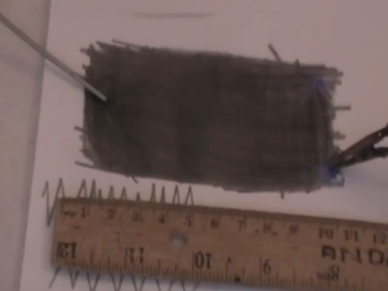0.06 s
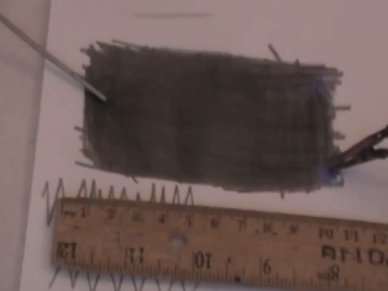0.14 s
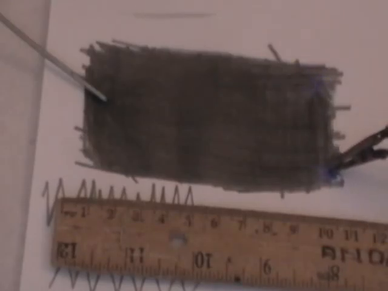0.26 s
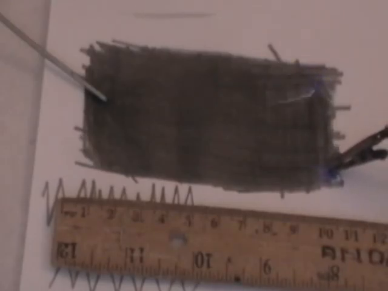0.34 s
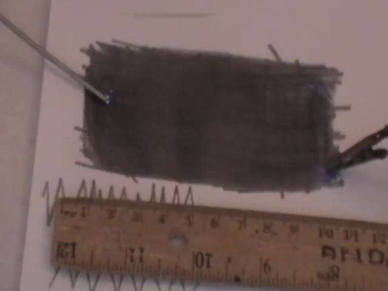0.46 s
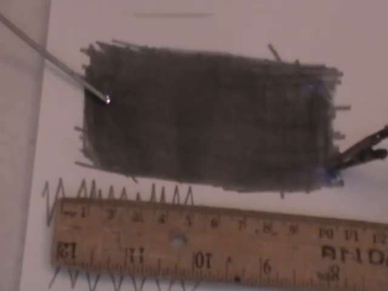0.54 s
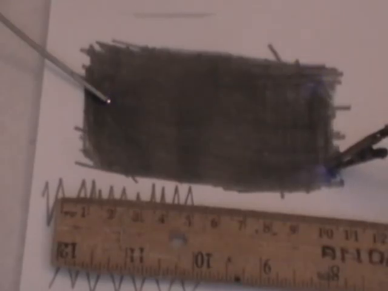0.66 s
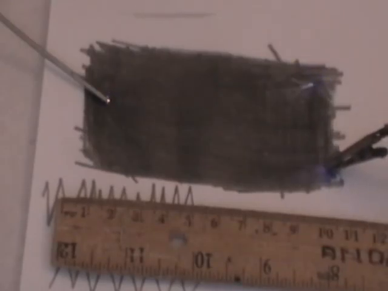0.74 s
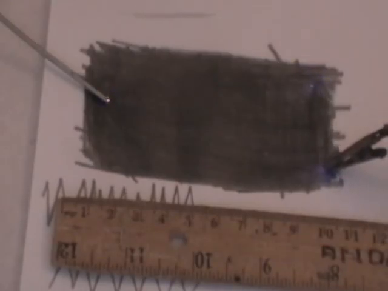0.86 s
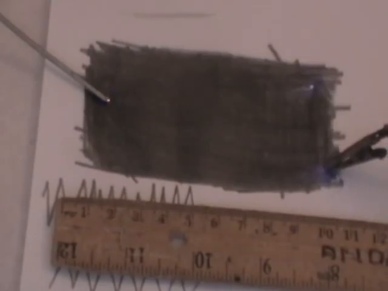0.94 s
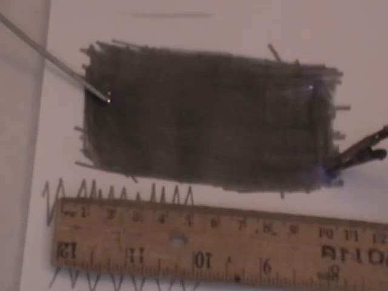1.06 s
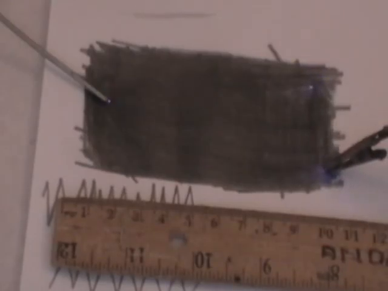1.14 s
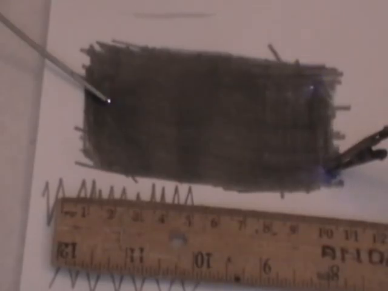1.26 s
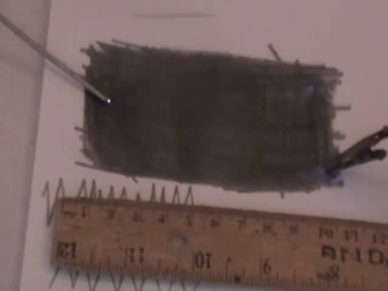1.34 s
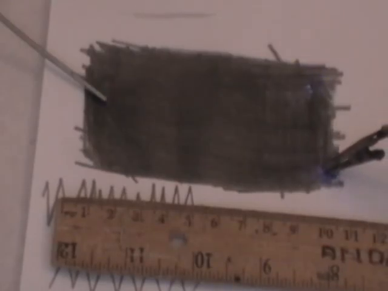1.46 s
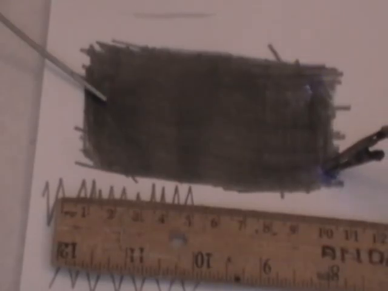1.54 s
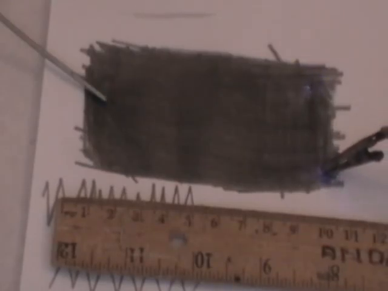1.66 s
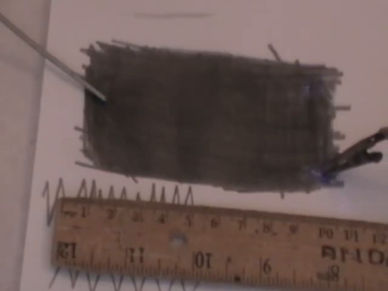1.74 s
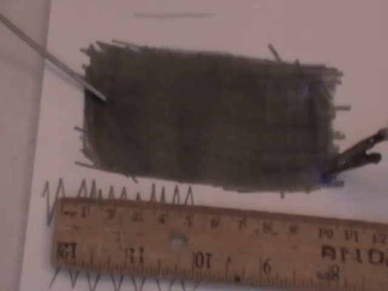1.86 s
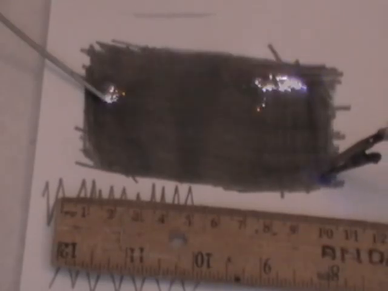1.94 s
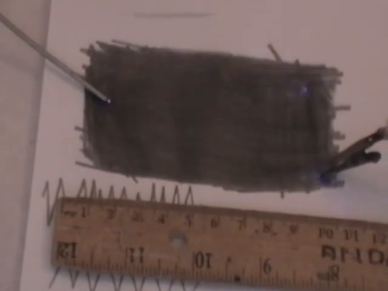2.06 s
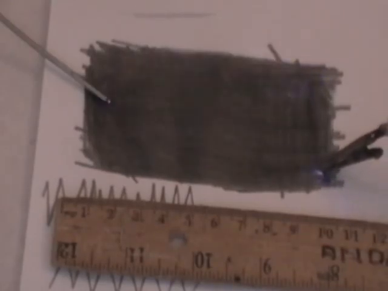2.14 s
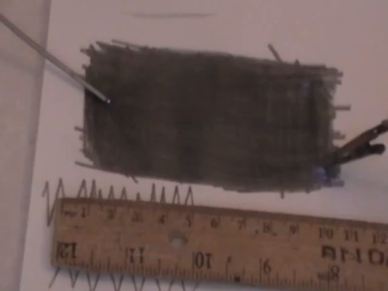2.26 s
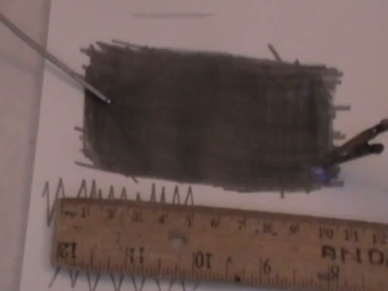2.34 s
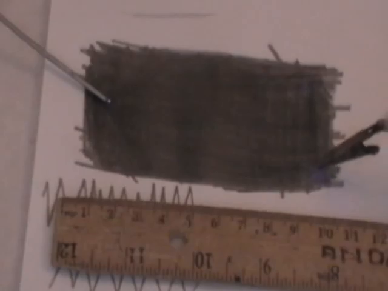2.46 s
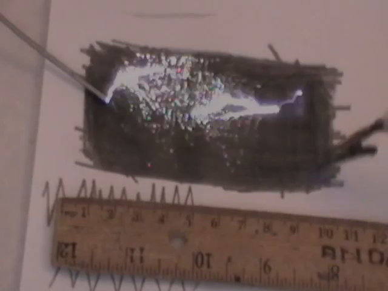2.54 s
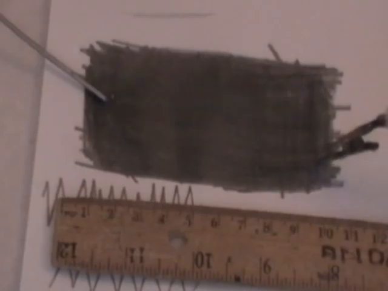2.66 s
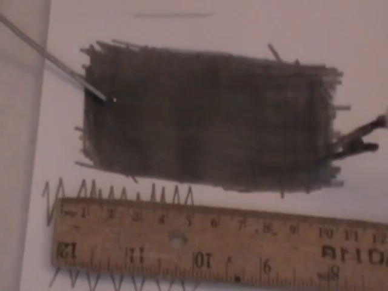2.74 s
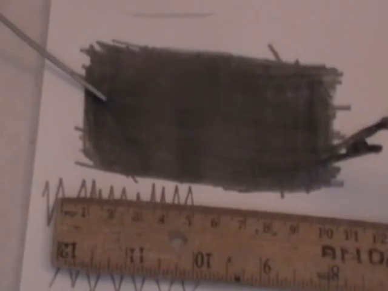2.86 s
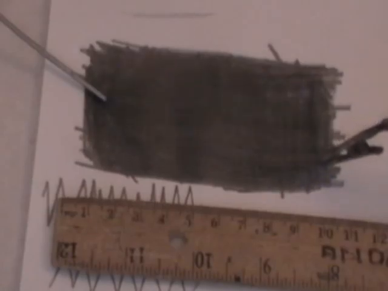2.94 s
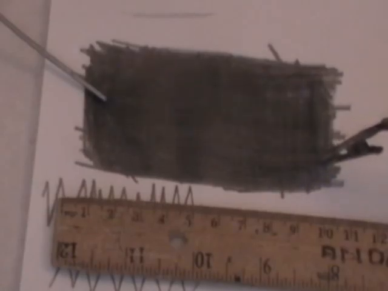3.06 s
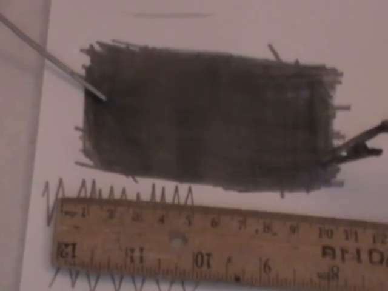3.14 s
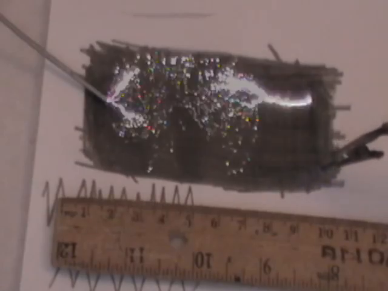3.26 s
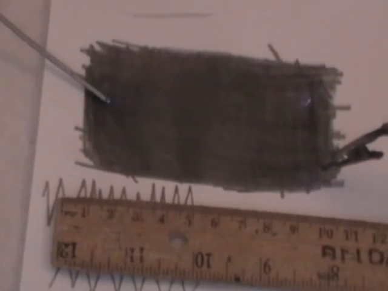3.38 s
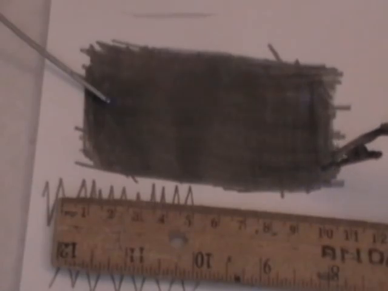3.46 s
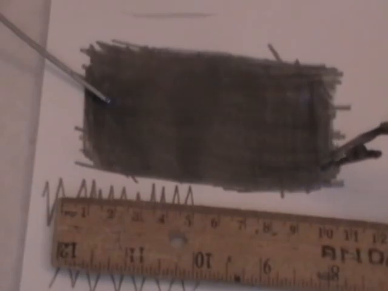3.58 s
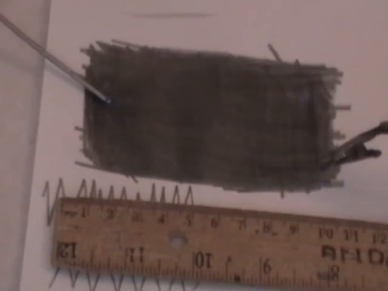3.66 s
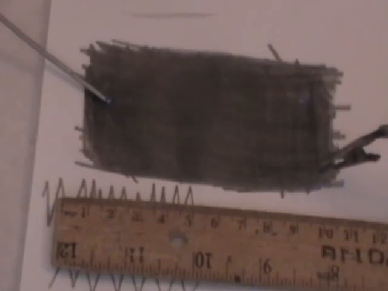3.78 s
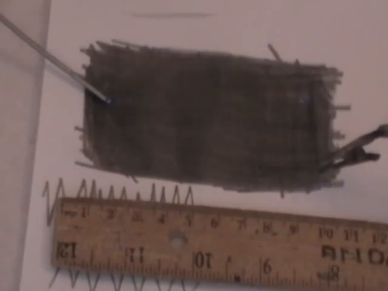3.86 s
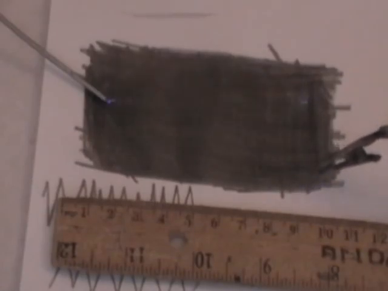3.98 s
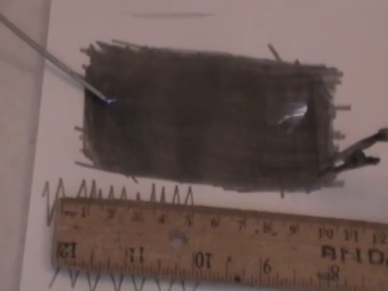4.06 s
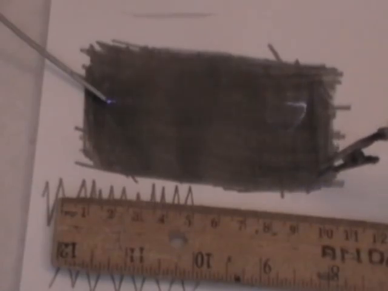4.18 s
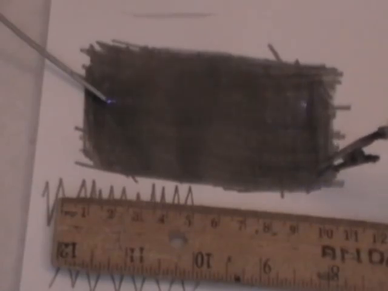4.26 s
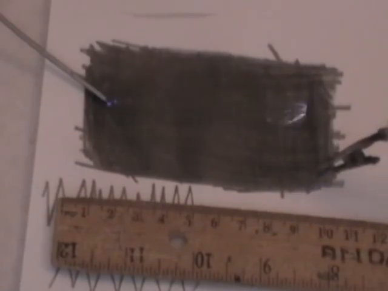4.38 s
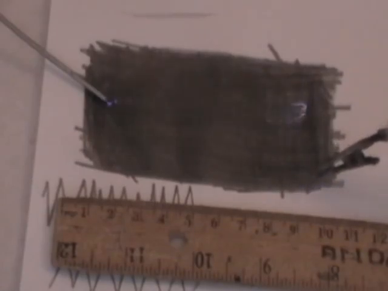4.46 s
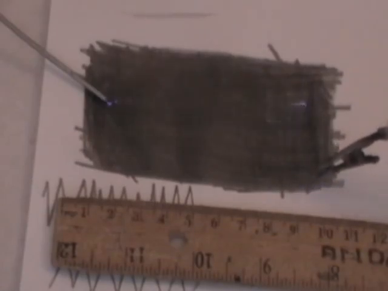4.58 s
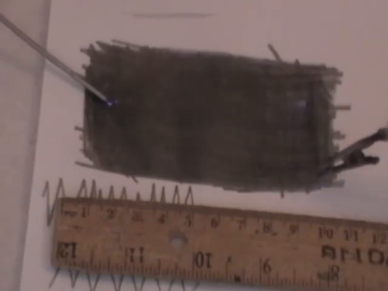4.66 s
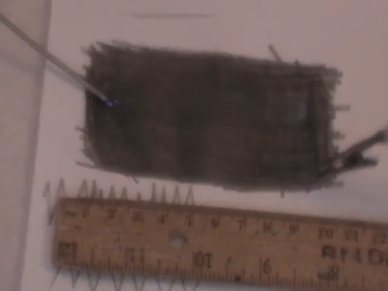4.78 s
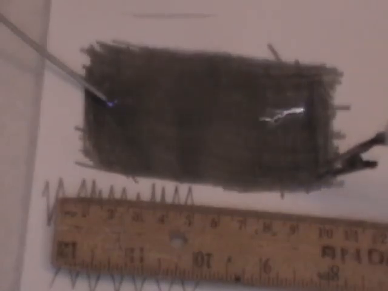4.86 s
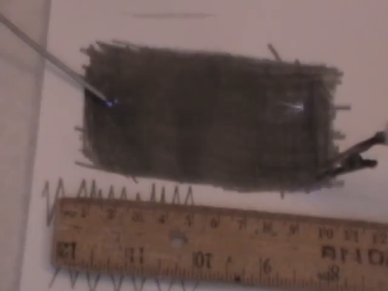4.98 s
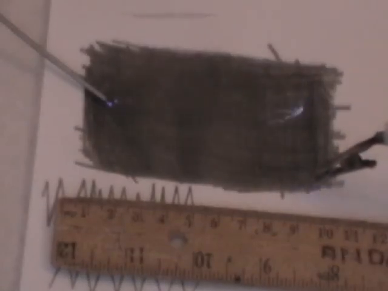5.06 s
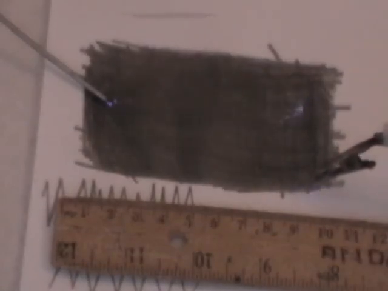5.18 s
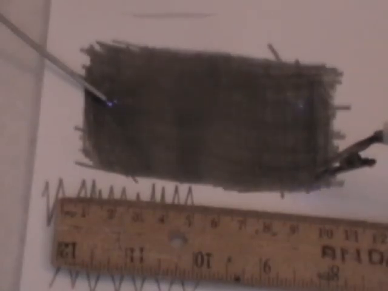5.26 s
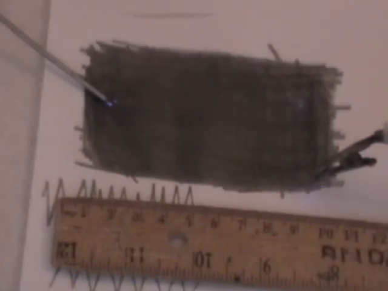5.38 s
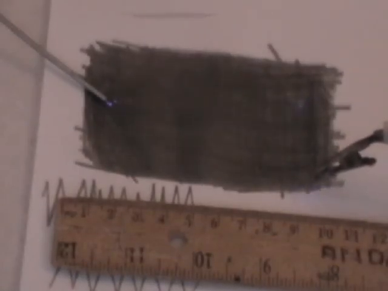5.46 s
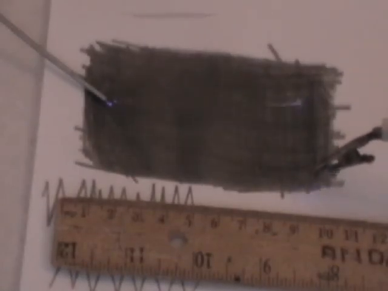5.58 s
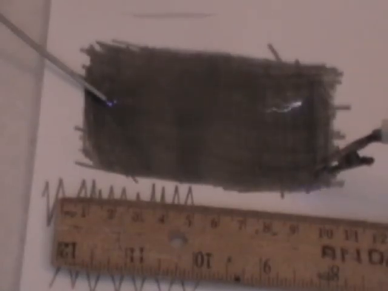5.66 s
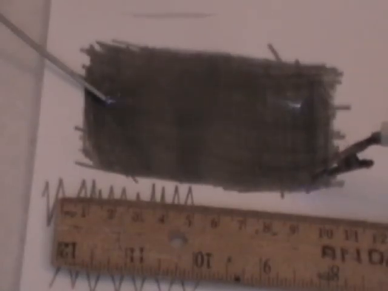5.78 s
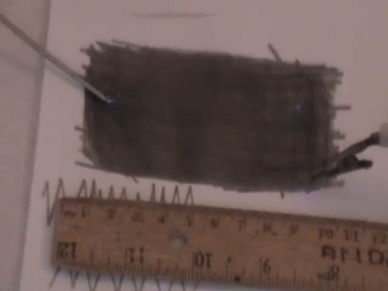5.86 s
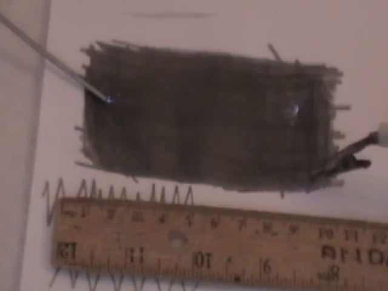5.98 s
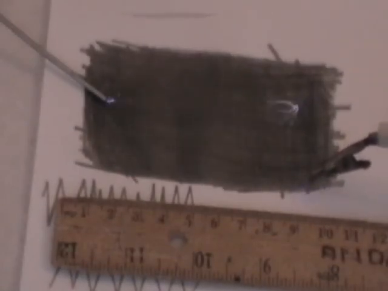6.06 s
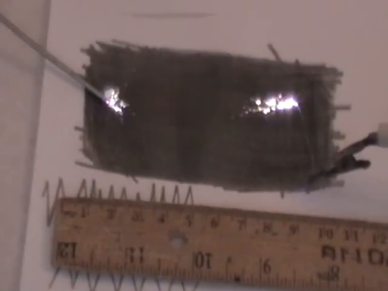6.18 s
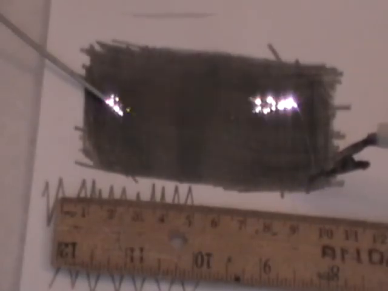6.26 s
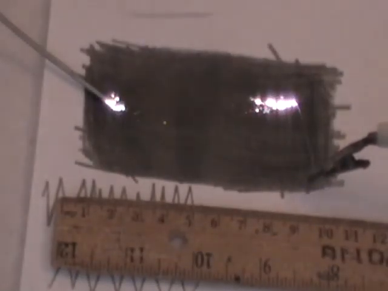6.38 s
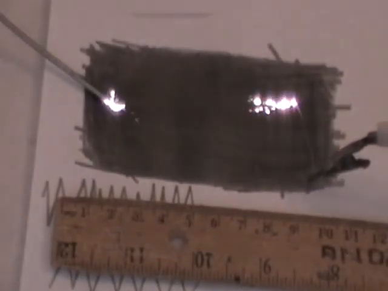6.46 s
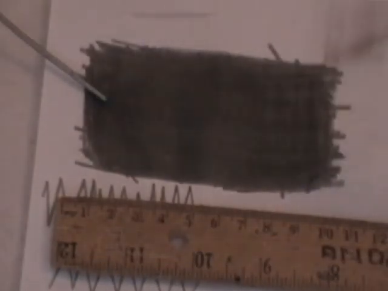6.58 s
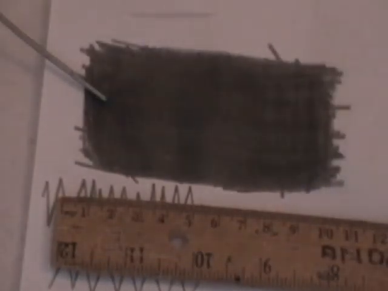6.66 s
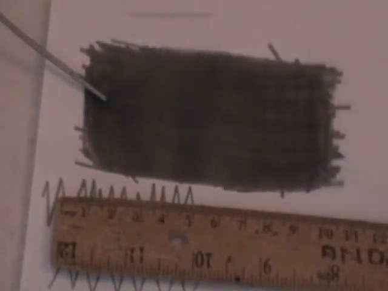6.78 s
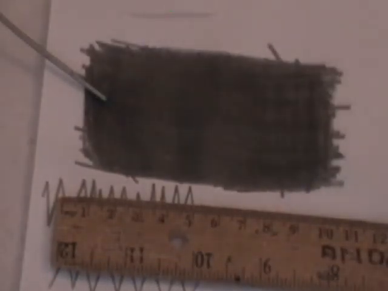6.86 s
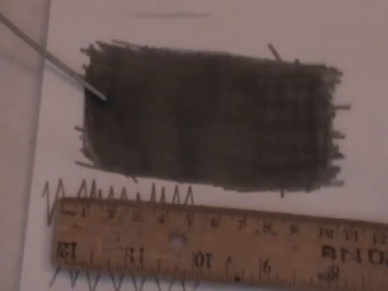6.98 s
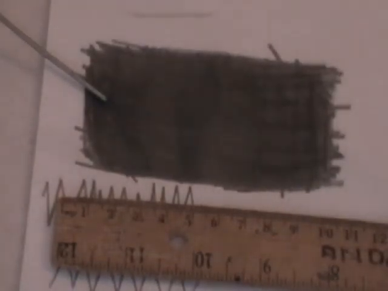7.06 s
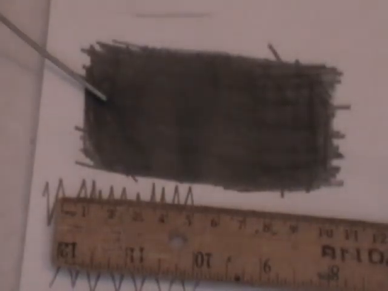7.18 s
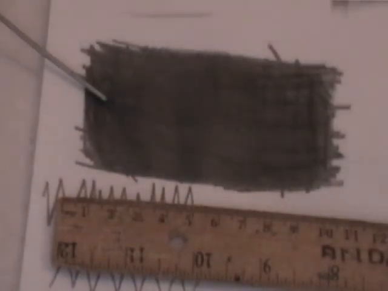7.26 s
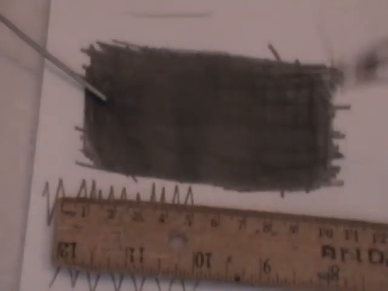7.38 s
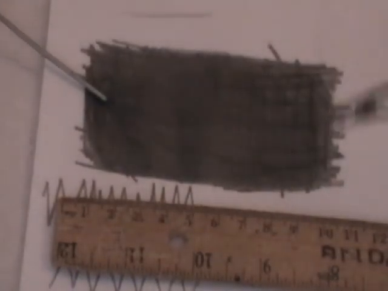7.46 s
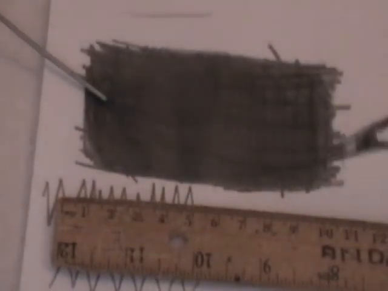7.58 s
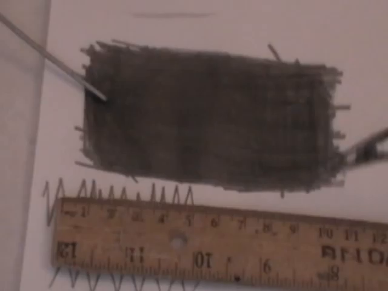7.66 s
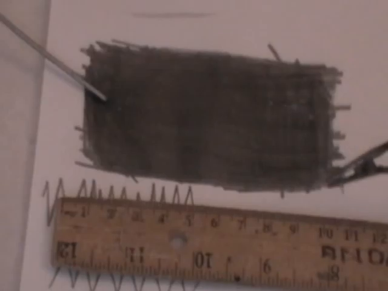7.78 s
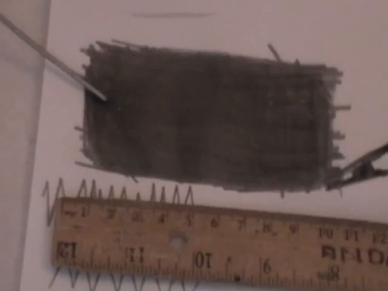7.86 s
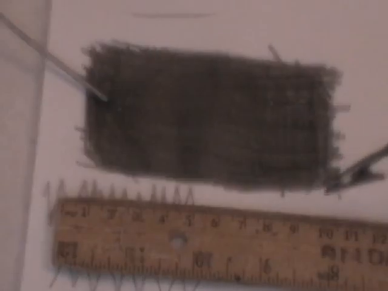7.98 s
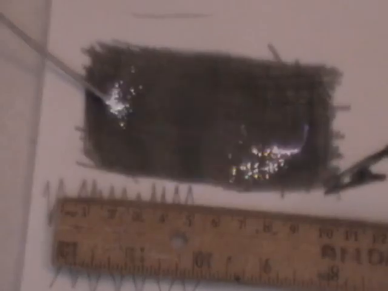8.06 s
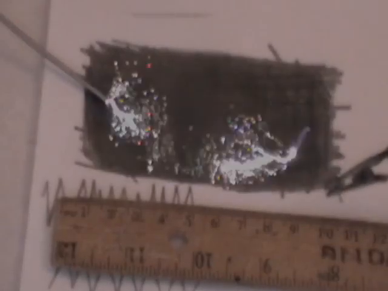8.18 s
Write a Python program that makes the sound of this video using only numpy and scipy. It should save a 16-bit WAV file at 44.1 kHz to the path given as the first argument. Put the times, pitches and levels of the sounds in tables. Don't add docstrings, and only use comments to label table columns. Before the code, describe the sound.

Close to a camera microphone in a small bare room, high-voltage sparks hiss brightly and steadily across graphite on paper. Small ticks and wavering whistles run through the fizz. Loud arc-over cracks burst out near two and two and a half seconds, a duller slap follows, then a huge snap after six. The hiss nearly vanishes, leaving hum and amplifier noise, then sputters back into one last bang.

```python
import sys
import numpy as np
from scipy import signal
from scipy.fft import rfft, irfft
from scipy.io import wavfile
from scipy.ndimage import uniform_filter1d

SR = 44100
rng = np.random.default_rng(int(sys.argv[2]) if len(sys.argv) > 2 else 0)


def invert_db(x):
    u = np.asarray(x, float) / 20
    return 10 ** u


def store_pcm(level_fs):
    pcm = np.round(np.clip(level_fs, -1, 1) * 32767).astype(np.int16)
    wavfile.write(sys.argv[1], SR, np.atleast_2d(pcm).T)


N = 362502

# frequency in Hz, level in dB per Hz.
SPARK_SPECTRUM = [(600, -71), (1000, -19), (2000, -20), (3200, -15.5), (3800, -10.5), (5700, -11),
                  (6500, -4.5), (7400, -1), (8900, -2), (9500, -5.5), (10400, -6), (11300, -10.5),
                  (13400, -14), (15800, -15)]
# time in s, current in dB, creeping path length from -1 to 1.
CURRENT = [(0, -37.5, -0.1), (.07, -35.5, -0.4), (.41, -42, -0.5), (.75, -38, -0.1), (.96, -37.5, -1),
           (1.24, -40, -0.6), (1.57, -38.5, -0.7), (2.0, -40.5, -0.4), (2.5, -37.5, 0), (2.95, -35, 0.7),
           (3.36, -34.5, 0.7), (3.6, -40, 0.6), (4.452, -42, 0.2), (4.459, -35.5, 0.6), (4.7, -37.5, -0.05),
           (5.3, -34, 0.24), (5.8, -35, .7), (6.0, -37.5, -0.1)]
# time in s, current in dB, path length from -1 to 1.
RETURN = [
    (6.62, -75, 0),
    (6.76, -56, 0),
    (6.83, -68, 0),
    (7.2, -57, 0),
    (7.549, -57.5, 0.019),
    (7.8, -48, 0),
    (7.93, -44, 0),
    (8.155, -37, .2),
]
# time in s, change in dB, pause in s.
QUENCH = [
    (.515, -3, 0.042),
    (2.49, -3, 0.028),
    (3.96, -0.5, .03),
    (4.12, 0, 0.022),
    (7.804, -8, 0.051),
    (7.86, -7, .01),
    (7.89, -5, .026),
]
SPARKS_PER_S = 900
LOW_DB, BRIGHT_DB, TOP_DB = 1.5, -3, -4
LOW_LAG = -0.43
FLICKER_DB, FLICKER_S, WANDER_DB = .8, .03, .8

ARC_S = [2.0371, 2.6625, 3.4033, 6.2674, 8.1630]
# blast in dB, tilt in dB per octave, dulling in dB per octave squared, room modes in dB.
ARCS = [
    (13, 1, 0.5, -2),
    (8.5, -2.5, 2, 3.5),
    (-1, -10, 2.5, 8),
    (14, 1.5, 0, -4),
    (13.5, 1.5, 0, 2),
]
# thump in dB, thump frequency in Hz, deafness in s.
KICKS = [
    (1.5, 160, 0.022),
    (-43, 29, 0.0002),
    (-27.5, 140, 0.00021),
    (1.5, 168, 0.013),
    (2.5, 112, 0.00011),
]
# frequency in Hz, level in dB per Hz.
BLAST_SPECTRUM = [(150, -17.5), (250, -24), (360, -12), (400, -20), (475, -17), (1170, -8.5), (1280, -11),
                  (1450, -8), (2950, -7.5), (3210, -3.5), (4630, -4), (8510, -1.5), (15900, -14.5)]
# delay in s, level in dB.
WALLS = [
    (0, -7.5),
    (.0021, -19),
    (.0034, -2),
    (.0069, 1),
    (.0076, -10),
]
# frequency in Hz, level in dB, decay time T60 in s.
ROOM_MODES = [
    (396, -37, 0.55),
    (421, -27.5, 0.19),
]

# start in s, length in s, from Hz, to Hz, level in dB.
TONES = [
    (1.0, .33, 800, 810, -71),
    (1.25, .22, 1205, 1230, -64),
    (1.49, .06, 1225, 1225, -62),
    (6.74, .88, 7800, 7650, -60),
    (6.725, .047, 5600, 2900, -57),
    (7.285, .13, 2300, 4900, -56),
]
# start in s, length in s, from Hz, to Hz, level in dB.
STREAMERS = [(0, .07, 15000, 15300, -49), (0.043, 0.092, 10200, 10200, -45),
             (0.172, 0.087, 15300, 13000, -47), (0.263, .1, 11200, 13200, -44),
             (0.397, .07, 12800, 11600, -44.5), (.6, .13, 12000, 12200, -46),
             (0.828, .08, 12300, 13000, -45), (.92, .08, 10300, 10400, -46),
             (1.44, 0.15, 10200, 10300, -41), (2.217, 0.081, 7200, 7160, -36),
             (2.367, 0.085, 9400, 8700, -41.5), (2.49, 0.067, 9800, 8900, -36.5),
             (2.418, 0.13, 3670, 4200, -50.5), (2.868, .07, 2410, 2530, -49),
             (2.959, 0.33, 3700, 3530, -47.5), (4.456, 0.54, 4960, 5070, -51),
             (4.979, 0.21, 5100, 5060, -42.5), (5.162, .7, 5000, 5050, -47),
             (4.801, 1.1, 4550, 4510, -50.5), (6.658, .08, 5770, 6000, -54.5),
             (6.69, 0.076, 6600, 7700, -55), (7.462, .27, 4950, 4250, -63.5), (4.659, .26, 5080, 5080, -52)]
# start in s, length in s, from Hz, to Hz, level in dB.
GLOWS = [
    (7.41, 0.45, 5300, 7500, -58),
    (7.36, 0.36, 7800, 13400, -63),
    (10, .26, 4900, 4200, -60),
    (6.08, 0.27, 5200, 5000, -49),
    (4.456, .12, 5500, 5200, -45),
    (4.5, 1.34, 4070, 3830, -56.5),
    (4.9, .95, 5600, 6000, -49),
]
TONE_BLUR, STREAMER_BLUR, GLOW_BLUR = 0.023, .065, .13
GLIDE_EASE, EDGE_DB, EDGE_S = 1.8, -8, 0.024

# start in s,
# peak in dB, tilt in dB per octave, length in s, echo in dB.
TICKS = [(0.5078, -6.5, -3.5, 0.0037, -7.5), (0.6785, -25, -4, 0.0055, 0),
         (0.815, -24.5, -4.5, 0.0048, 2.5), (1.652, -19, -1, 0.0058, -2), (1.802, -34, -7, 0.0046, -5),
         (1.88, -21, 5, 0.0064, -8), (1.934, -14, 5, 0.0089, -10), (4.397, -20, 6, 0.005, -12),
         (4.458, -23, 2, 0.0049, -8), (6.6464, -24.5, -6.5, 0.0063, -13), (7.0514, -31, 1.5, 0.005, -8),
         (7.3594, -46, -2, 0.0047, -8), (7.753, -31, 1, 0.005, -7), (7.783, -23, 0.5, 0.02, -8),
         (7.8526, -19.5, 0.5, 0.005, -14), (7.868, -26, 2, 0.005, -8), (7.881, -22, -2, 0.0038, -10),
         (7.917, -17, 1.5, 0.0063, -6), (7.928, -16.5, -2.5, 0.006, -5), (7.9892, -27, -3, 0.0044, 1),
         (3.4034, 12, -6, 0.00074, -38)]
# frequency in Hz, bandwidth in Hz, level in dB, decay time T60 in s.
KNOCK = (720, 450, -45, 0.27)
KNOCK_S = .5095
# frequency in Hz, bandwidth in Hz, level in dB, T60 in s.
SHEET = (1619, 500, -21.5, 0.15)

# frequency in Hz, decay time T60 in s.
ROOM_T60 = [(250, 0.36), (500, 0.42), (1000, 0.35), (2700, 0.33), (5000, 0.28), (8000, 0.25), (11000, 0.21),
            (16000, 0.16)]
# frequency in Hz, likeness from 0 to 1.
ROOM_SAME = [(60, 0.77), (300, 1), (700, 0.99), (1400, 0.99), (3100, .92), (5600, 0.89), (6800, 0.93),
             (9600, 0.95), (10800, 0.93), (15500, 0.29)]

# frequency in Hz, level in dB rms.
HUM = [
    (100.0, -59),
    (200.0, -70.5),
    (300.0, -63),
]
MOTOR_HZ, MOTOR_WIDTH, MOTOR_DB = 187.4, 14, -65
# time in s, level in dB.
HANDLING = [
    (3.6, -76),
    (4.5, -70),
    (4.9, -72),
    (5.3, -74),
    (5.65, -81),
    (6.19, -67),
]
GRIP_S, STILL_DB = .13, -93.5
# frequency in Hz, level in dB per Hz.
FLOOR_SPECTRUM = [(25, -22), (70, -18), (150, -11), (400, -11), (1070, -15), (2000, -17), (3500, -20),
                  (4700, -23), (6500, -15.5), (7600, -10), (8300, -18.5), (11500, -19.5), (14000, -25),
                  (15900, -23.5)]
# frequency in Hz, likeness from 0 to 1.
FLOOR_SAME = [(60, 0.99), (130, 0.97), (290, 0.92), (640, 0.52), (1410, 0.72), (3100, 0.63), (6820, 1),
              (15000, 0.89)]
FLOOR_DB = -52.5
WIDE_HZ, WIDE_DB = 10800, -10.5
EDGE_HZ = 15760


def evened(x):
    return x / np.sqrt(np.mean(x ** 2) + 1e-20)


def read(points, hz):
    f, value = np.transpose(points)
    return np.interp(np.log(hz + 1), np.log(f + 1), value)


def add(mix, s, sound):
    part = mix[..., round(s * SR):][..., :sound.shape[-1]]
    part += sound[..., :part.shape[-1]]


def resonate(x, hz, width):
    turn = np.exp(2j * np.pi * np.cumsum(hz * np.ones(len(x))) / SR)
    r = np.exp(-np.pi * width / SR)
    return 2 * (turn * signal.lfilter([1 - r], [1, -r], x / turn)).real


def narrow_noise(n, hz, width):
    return evened(resonate(resonate(rng.standard_normal(n), hz, width), hz, width))


def pair(gain_db, same, size):
    a, b, c, d = rng.standard_normal((gain_db.shape[1], gain_db.shape[0], 4)).T
    like = np.clip(read(same, np.fft.rfftfreq(size, 1 / SR)), 0, 1)[:, None]
    mid = np.sqrt(1 + like) * (a + 1j * b)
    side = np.sqrt(1 - like) * (c + 1j * d)
    field = np.array([mid + side, mid - side]) * invert_db(gain_db)
    return signal.istft(field, nperseg=size, noverlap=size * 3 // 4)[1]


def drift(length_s):
    size = int(length_s * SR)
    return evened(uniform_filter1d(uniform_filter1d(rng.standard_normal(N), size), size))


def spark_train():
    wobble = evened(uniform_filter1d(rng.standard_normal(N), 60))
    rate = np.abs(SPARKS_PER_S * (1 + .35 * wobble))
    fired = np.diff(np.floor(np.cumsum(rate) / SR), prepend=0)
    strength = invert_db(1.0 * rng.standard_normal(N))
    sizzle = signal.lfilter([1], [1, -.93], fired * strength)
    return (evened(sizzle) + 2.4) * rng.standard_normal(N)


def hiss():
    t = np.arange(N) / SR
    near, away = (np.array([np.interp(t, rows[0], column) for column in rows[1:]])
                  for rows in (np.transpose(CURRENT), np.transpose(RETURN)))
    level_db, path = np.where(t < ARC_S[3], near, away)
    low_db = LOW_DB * path + LOW_LAG * (np.maximum(level_db, -46) + 39.5) + WANDER_DB * drift(0.24) - 1.5
    bright_db = BRIGHT_DB * path + WANDER_DB * drift(.06) + 0.6
    top_db = TOP_DB * path + WANDER_DB * drift(.07) - 1.0
    level_db = level_db + FLICKER_DB * drift(FLICKER_S)
    level_db += sum(db * (t > s) * np.clip((s + pause - t) / .003, 0, 1) for s, db, pause in QUENCH)

    hz, frame_s, z = signal.stft(spark_train(), SR, nperseg=256)
    at = np.minimum((frame_s * SR).astype(int), N - 1)
    low = np.interp(hz, [5200, 6200], [1, 0])[:, None]
    bright = np.interp(hz, [9100, 10200, 10200, 11800], [0, 1, 1, 0])[:, None]
    top = np.interp(hz, [10600, 11800], [0, 1])[:, None]
    patches = uniform_filter1d(uniform_filter1d(rng.standard_normal(z.T.shape), 24, 0), 6, 1)
    field_db = read(SPARK_SPECTRUM, hz)[:, None] + 0.68 * evened(patches).T
    field_db += low * low_db[at] + bright * bright_db[at] + top * top_db[at]
    noise = signal.istft(z * invert_db(field_db), SR, nperseg=256)[1][:N]
    return evened(noise) * invert_db(level_db + 1.72)


def coloured(x, tilt_db, dull_db):
    hz = np.fft.rfftfreq(x.shape[-1], 1 / SR)
    octave = np.log2((hz + 300) / 5000)
    gain_db = read(BLAST_SPECTRUM, hz) + tilt_db * octave - dull_db * octave ** 2
    return irfft(rfft(x) * invert_db(gain_db))[..., :-400]


def arc(echo, blast_db, tilt_db, dull_db, modes_db, thump_db, thump_hz, deaf_s):
    tail = coloured(echo, tilt_db, dull_db)
    t = np.arange(tail.shape[1]) / SR
    level = tail / np.sqrt(np.mean(tail[:, :900] ** 2))
    deafened = np.clip(t / max(deaf_s, 1e-4), .04, 1) ** 2.0
    early = sum(invert_db(db + 8) * np.exp(-np.maximum(t - s, 0) / 0.00043) * (t >= s) for s, db in WALLS)
    crowd = 1 + 2.1 * np.exp(-t / 0.0034)
    boom = sum(invert_db(db + modes_db - 60 * t / t60) * np.sin(2 * np.pi * hz * t) for hz, db, t60 in ROOM_MODES)
    thump = np.cos(2 * np.pi * thump_hz * t) * np.exp(-t / 0.0033)
    blast = invert_db(blast_db - 15.5) * (level * (deafened * crowd + early) + boom)
    return blast + invert_db(thump_db) * thump


def whistle(blur, length, from_hz, to_hz, db):
    t = np.arange(0, length, 1 / SR)
    pitch = to_hz + (from_hz - to_hz) * (1 - t / length) ** GLIDE_EASE
    width = blur * np.sqrt(from_hz * to_hz)
    a, b = rng.standard_normal((2, 2 * SR))[:, :len(t)]
    tone = evened(resonate(resonate(a, pitch, width), pitch, 2 * width))
    flutter_db = np.sqrt(width / 160) * evened(uniform_filter1d(b, 700))
    inside = np.minimum(t, length - t)
    level_db = db + flutter_db + EDGE_DB * np.exp(-inside / EDGE_S)
    return tone * invert_db(level_db) * np.minimum(inside / .004, 1)


def tick(peak_db, tilt_db, length):
    decay = np.exp(-np.arange(2000) / SR / max(length, 3e-4))
    burst = coloured(rng.standard_normal(2000) * decay, tilt_db, 0)
    return invert_db(peak_db - 9.5) * burst / abs(burst).max()


def knock(hz, width, db, t60):
    t = np.arange(9000) / SR
    return narrow_noise(9000, hz, width) * invert_db(db - 60 * t / t60)


def room():
    hz = np.fft.rfftfreq(256, 1 / SR)[:, None]
    t = np.arange(420) * 64 / SR
    tail = pair(-60 * t / read(ROOM_T60, hz), ROOM_SAME, size=256)[:, 128:]
    return tail / np.linalg.norm(tail[0])


def background():
    t = np.arange(N) / SR
    hum = sum(np.sqrt(2) * invert_db(db) * np.sin(2 * np.pi * (hz * t + rng.random())) for hz, db in HUM)
    motor = narrow_noise(N, MOTOR_HZ, MOTOR_WIDTH)
    field_db = read(FLOOR_SPECTRUM, np.fft.rfftfreq(2048, 1 / SR))[:, None] + np.zeros(N // 512 + 5)
    floor = evened(pair(field_db, FLOOR_SAME, size=2048)[:, :N])
    grip = sum(invert_db(db) * np.exp(-((t - s) / GRIP_S) ** 2) for s, db in HANDLING)
    rumble = narrow_noise(N, 35, 25) * (invert_db(STILL_DB) + grip)
    return rumble + hum * invert_db([[-1.0], [1.0]]) + invert_db(MOTOR_DB) * motor + invert_db(FLOOR_DB) * floor


def scene():
    echo, steady, floor = room(), hiss(), background()
    cracks, sent = np.zeros(N), np.zeros(N)
    for s, *row, echo_db in TICKS:
        burst = tick(*row)
        add(cracks, s, burst)
        add(sent, s, invert_db(echo_db) * signal.lfilter([.3], [1, -.7], burst))
    add(cracks, KNOCK_S, knock(*KNOCK))
    add(cracks, ARC_S[2], knock(*SHEET))
    for blur, table in [(TONE_BLUR, TONES), (GLOW_BLUR, GLOWS), (STREAMER_BLUR, STREAMERS)]:
        for s, *row in table:
            add(steady, s, whistle(blur, *row))
    wet = signal.fftconvolve((invert_db(-8.0) * steady + sent)[None], echo, axes=1)[:, :N]
    mix = invert_db(0.37) * steady + cracks + wet + floor
    for s, row, kick in zip(ARC_S, ARCS, KICKS):
        add(mix, s, arc(echo, *row, *kick))
    return mix


def roll_off(x):
    return signal.sosfilt(signal.butter(12, 16450, fs=SR, output="sos"), x)


def record(dry):
    high = signal.butter(6, WIDE_HZ, "high", fs=SR, output="sos")
    spread = signal.sosfilt(high, np.roll(dry.mean(0), 37))
    dry = dry + invert_db(WIDE_DB) * spread * [[1], [-1]]
    lag = np.exp(-1 / (0.01 * SR))
    power = np.minimum((dry ** 2).mean(0), 3.0)
    power_db = 10 * np.log10(signal.lfilter([1 - lag], [1, -lag], power) + 1e-12)
    over_db = np.maximum(power_db + 9.0, 0)
    held = np.clip(dry / invert_db(1.28 * over_db), -.95, .95)
    band_limit = signal.firwin(767, EDGE_HZ, window=("kaiser", 4.0), fs=SR)
    mix = signal.oaconvolve(held, band_limit[None], "same")
    return roll_off(mix)


dry = scene()
out = record(dry)
store_pcm(out)
```